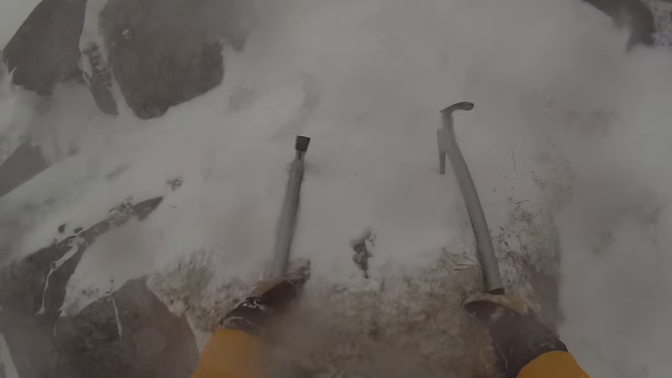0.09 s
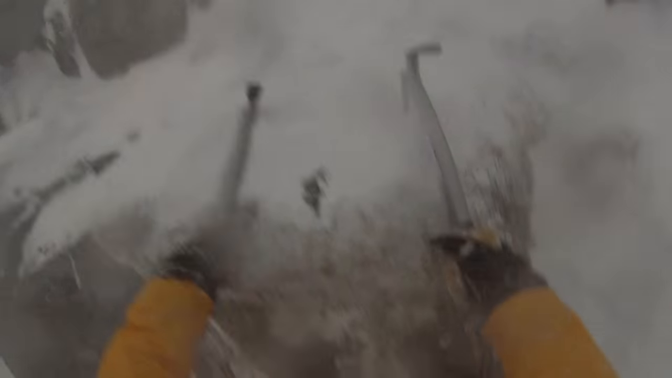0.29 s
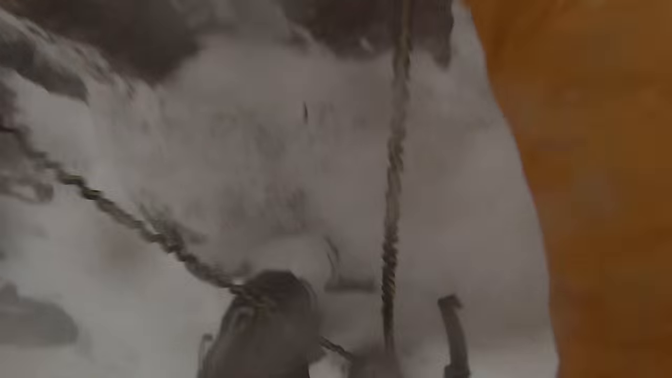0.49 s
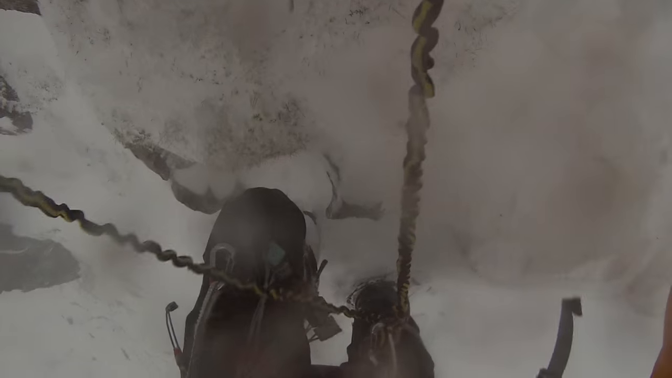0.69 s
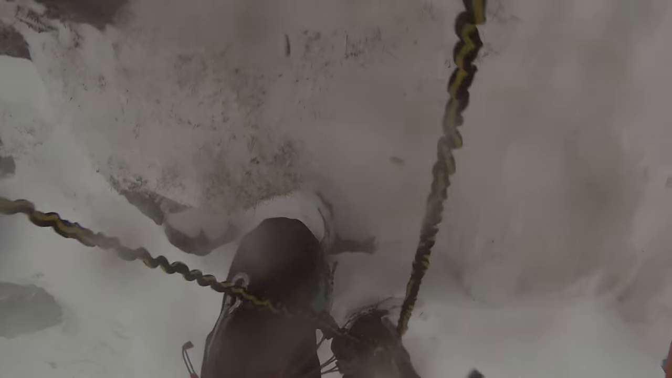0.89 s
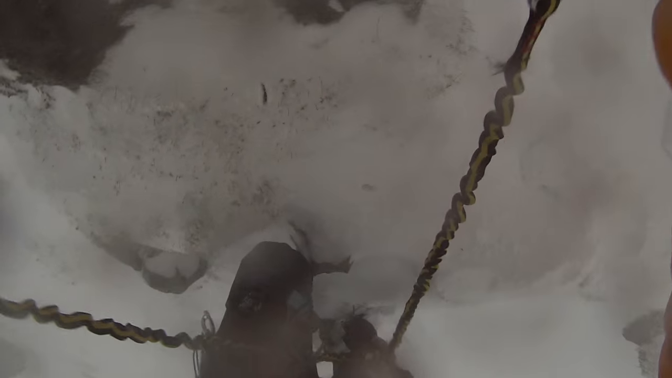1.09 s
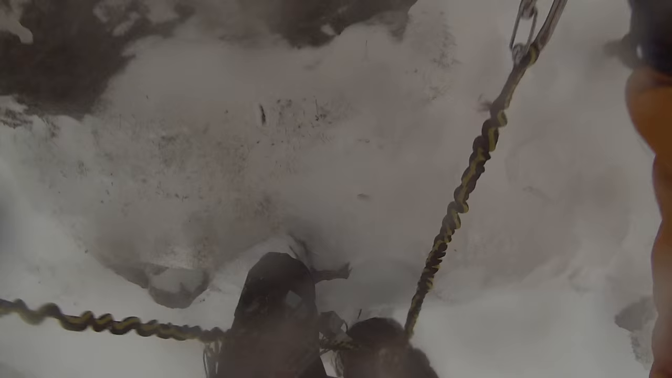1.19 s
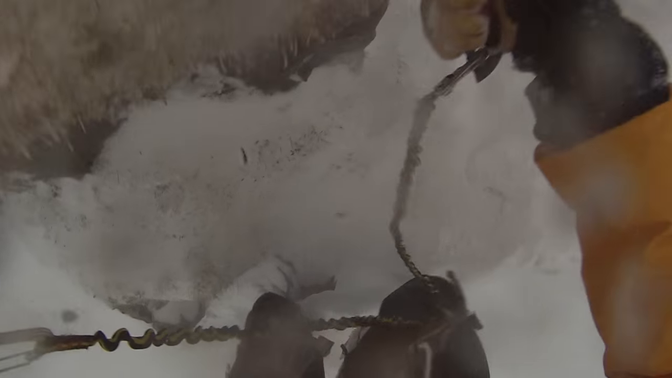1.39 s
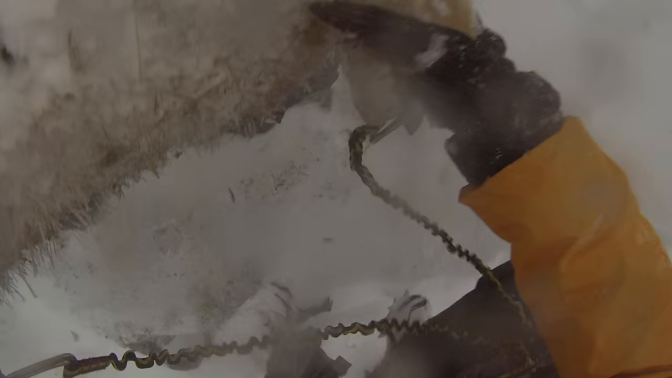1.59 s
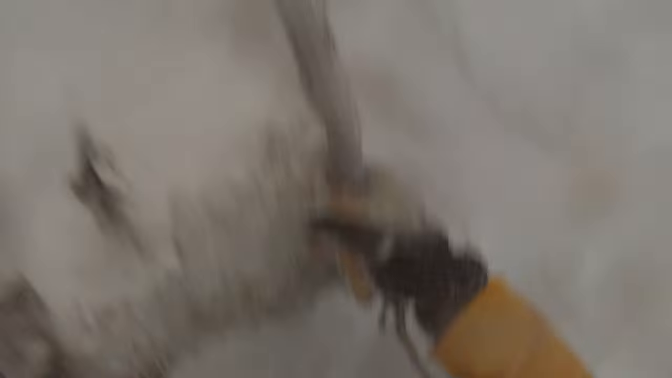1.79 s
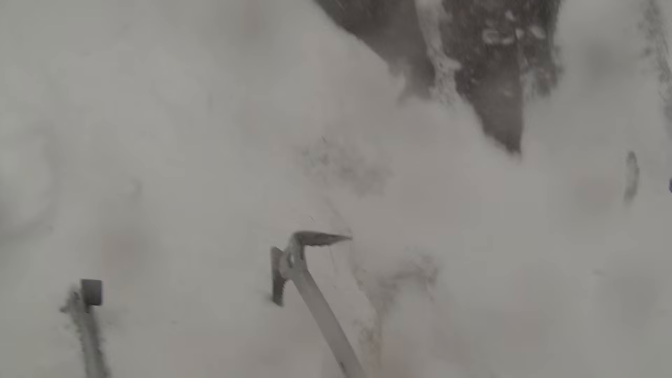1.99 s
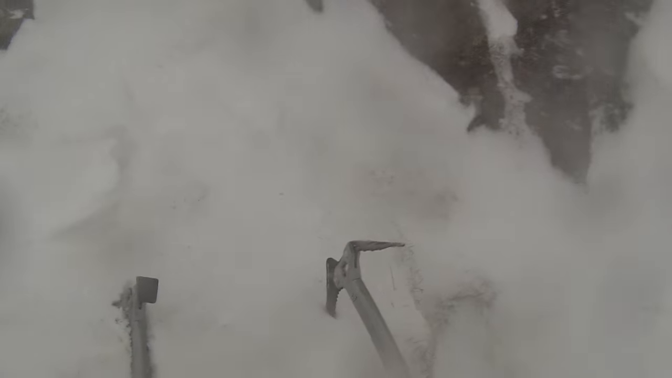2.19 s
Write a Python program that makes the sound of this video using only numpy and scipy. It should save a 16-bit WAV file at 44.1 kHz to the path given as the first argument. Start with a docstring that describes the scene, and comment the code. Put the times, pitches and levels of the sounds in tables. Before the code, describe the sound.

Two short axe chocks into frozen turf, with crisp snow crunch, icy snaps and low wind rumble

```python
"""Two ice axes bite into frozen snow and turf, each with a short dull chock, heard from a worn camera.
Each bite is a few ringing tones that sink in pitch, over a thud of shaped noise.
Snow crunches and stiff cloth rustles as showers of random ticks; icy snaps and crumbles are filtered bursts.
Jolts boom in the camera mount as fading low tones, and wind rumbles and hisses as slowly swelling noise."""
import sys
import numpy as np
from scipy.fft import rfft, irfft, next_fast_len
from scipy.io import wavfile
from scipy.ndimage import map_coordinates

SR = 44100
rng = np.random.default_rng(int(sys.argv[2]) if len(sys.argv) > 2 else 0)


def wav_out(sig):
    """Save sig, one row per channel (or a flat mono array), as 16-bit PCM at SR to the path in sys.argv[1]."""
    wavfile.write(sys.argv[1], SR, np.round(np.clip(np.atleast_2d(sig).T, -1, 1) * 32767).astype(np.int16))


N = 99225  # length in samples

# slow sway of the body against the microphone: t/s, level/dB
SWAY = [(0, -42.5), (.12, -49.5), (.21, -31), (.3, -54), (.41, -46.5), (.51, -34), (.6, -55), (.76, -58),
        (.85, -47), (1.02, -51), (1.42, -51.5), (1.7, -65.5), (1.8, -48.5), (1.97, -32), (2.05, -46.5),
        (2.25, -53)]
# tone colour of breaking ice and frozen snow: f/Hz, relative level/dB
ICE_COLOUR = [(300, -12), (1000, -11.5), (1550, 2), (3200, 4.5), (4200, -4), (5100, 7), (6800, -3),
              (11300, -3.5), (15000, -14.5)]
ICE_DB = 10  # added to the level of every snap and crumble


def amp(db):
    """Turn decibels into a gain."""
    return 10 ** (np.asarray(db) / 20)


def unit(x):
    """Scale to an rms (average strength) of 1."""
    return x / np.sqrt(np.mean(x ** 2) + 1e-20)


def curves(rows):
    """Draw straight lines between the rows: one curve for each column after the time."""
    times, *columns = np.transpose(rows)
    return [np.interp(np.arange(N) / SR, times, column) for column in columns]


def wobble(rate):
    """A smooth random curve through `rate` random points a second."""
    points = rng.standard_normal(int(N * rate / SR) + 4)
    return map_coordinates(points, [np.arange(N) * rate / SR])


def coloured(x, points, piece_hz=None):
    """Filter x to the (f/Hz, level/dB) points; a breaking piece also favours its own pitch."""
    lift_db, width_octaves = 10, 0.43
    m = 2 * next_fast_len(len(x) // 2 + 4096)
    octave = np.log2(np.fft.rfftfreq(m, 1 / SR) + 1)
    hz, db = np.transpose(points)
    shape_db = np.interp(octave, np.log2(hz + 1), db)
    if piece_hz:
        distance = (octave - np.log2(piece_hz)) / width_octaves
        shape_db = shape_db + lift_db * np.exp(-distance ** 2)
    # folding the cepstrum makes the filter respond at once, with nothing ahead of the blow
    cepstrum = irfft(np.log(unit(amp(shape_db)) + 1e-9), m)
    cepstrum[1:m // 2] *= 2
    cepstrum[m // 2 + 1:] = 0
    response = np.exp(rfft(cepstrum))
    return irfft(rfft(x, m) * response, m)[:len(x)]


def noise(points, size=N):
    """Coloured noise of rms 1, without the filter's start-up."""
    hiss = rng.standard_normal(size + 4096)
    return unit(coloured(hiss, points)[-size:])


def fade(t, t60):
    """Die away by 60 dB in t60 seconds."""
    return np.exp(-np.log(1000) * t / t60)


def add(track, s, sound):
    """Mix a sound into the track at s seconds."""
    part = track[max(0, round(s * SR)):][:len(sound)]
    part += sound[:len(part)]


def fractures(per_s, spread_db):
    """Sparse ticks at random moments, of random size up to a largest one, rms 1."""
    size_db = spread_db * np.minimum(rng.standard_normal(N), 1.4)
    sizes = amp(size_db) * rng.choice([-1, 1], N)
    happens = rng.random(N) < per_s / SR
    return unit(sizes * happens)


def crunch():
    """Snow and stiff cloth give way in clumps: crisp grains of several sizes, a fine rub, a duller scrape."""
    # strength of the crunch and rustle: t/s, crisp level/dB, scrape level/dB (both before the trim)
    rustle = [(0, -42, -43), (0.025, -44, -41.5), (0.06, -48, -53), (0.11, -51.5, -46), (0.19, -42, -44.5),
              (0.23, -45, -38.5), (0.27, -48.5, -48), (0.345, -51, -49.5), (0.445, -41.5, -43),
              (0.5, -48, -41.5), (0.55, -47.5, -47), (0.62, -49.5, -50.5), (0.68, -58, -57),
              (0.73, -57, -61.5), (0.78, -48.5, -58), (0.82, -52.5, -57), (0.885, -43, -47.5),
              (0.92, -47, -51.5), (1.07, -47.5, -49), (1.12, -49.5, -51.5), (1.17, -43, -45.5),
              (1.23, -51, -49), (1.32, -45, -49.5), (1.37, -49.5, -46), (1.425, -54.5, -50),
              (1.51, -42, -43.5), (1.59, -50.5, -50), (1.65, -48.5, -47.5), (1.678, -53, -48.5),
              (1.688, -56.5, -54), (1.745, -65, -64), (1.785, -52.5, -52.5), (1.815, -55, -47.5),
              (1.845, -55.5, -55), (1.88, -45.5, -47), (1.97, -50.5, -42), (2.03, -53.5, -50),
              (2.075, -50.5, -48.5), (2.09, -60.5, -55.5), (2.155, -65, -53), (2.19, -52.5, -44),
              (2.25, -43.5, -44)]
    # tone colour of the crisp treble: f/Hz, relative level/dB
    crisp_colour = [(300, -18.5), (1000, -12), (1800, -14), (3000, 0.5), (4200, 1), (5100, 3.5),
                    (6400, -3.5), (9500, -6.5), (11200, -6), (13500, -15), (15500, -17)]
    # tone colour of the scraping middle: f/Hz, relative level/dB
    scrape_colour = [(150, -5.5), (400, -16.5), (820, -20.5), (1050, -4), (1200, -10), (1420, 2.5),
                     (2200, -1), (2900, -8), (5000, -20.5), (14000, -28)]
    # favoured pitch of each size of grain: f/Hz
    grain_hz = [2000, 3200, 5000, 7500, 11500]
    trim_db, rub_db = -2, -1.5
    crisp_db, scrape_db = curves(rustle)
    clumps_db = 1.69 * wobble(130)  # quick random swells
    grains = np.zeros(N)
    for hz in grain_hz:
        ticks = fractures(per_s=170, spread_db=11)
        grains += coloured(ticks, crisp_colour, hz)
    crisp = unit(unit(grains) + amp(rub_db) * noise(crisp_colour))
    scratches = coloured(fractures(per_s=600, spread_db=5), scrape_colour)
    scrape = unit(scratches + 0.89 * noise(scrape_colour))
    crisp_gain = amp(crisp_db + trim_db + clumps_db)
    scrape_gain = amp(scrape_db + trim_db + clumps_db)
    return crisp_gain * crisp + scrape_gain * scrape


def mount():
    """The camera mount murmurs as the body sways, and swings at a low pitch after each jolt."""
    # jolts of the mount: t/s, level/dB, f/Hz, rise/s, time to fade by 60 dB/s
    jolts = [(0.189, -28, 112, 0.0069, .06), (.2421, -5, 118.8, 0.002, 0.105),
             (0.491, -26.5, 116.2, 0.018, 0.2), (0.61, -32, 120.2, 0.0021, 0.13),
             (0.862, -31, 121.5, 0.013, 0.12), (.932, -33.5, 112, 0.006, 0.14),
             (1.163, -24.5, 112.6, 0.0096, 0.073), (1.319, -29, 79, 0.0026, 0.053),
             (1.441, -37, 113, 0.0044, 0.1), (1.79, -26, 125, 0.006, 0.091),
             (1.907, -28, 90.7, 0.0065, 0.17), (1.9575, -17.5, 126, 0.004, 0.082)]
    # tone colour of the boom: f/Hz, relative level/dB
    boom_colour = [(15, 23), (28, 24), (50, -8), (75, 2), (110, 3), (200, -11), (400, -25), (1500, -112)]
    # tone colour of the murmur: f/Hz, relative level/dB
    murmur_colour = [(15, 4), (40, -20), (70, -0.5), (100, -2.5), (122, 4), (150, -12.5), (190, -18),
                     (300, -26.5), (600, -34), (2000, -100)]
    boom_db, boom_t60_s = -14.5, 0.16  # boom level is relative to the swing
    out, t = np.zeros(N), np.arange(SR // 3) / SR
    for s, db, hz, rise, t60 in jolts:
        swing = -np.sin(2 * np.pi * hz * t) * fade(t, t60)
        boom = amp(boom_db) * noise(boom_colour, size=len(t)) * fade(t, boom_t60_s)
        onset = 1 - np.exp(-t / rise)
        add(out, s, amp(db) * (swing + boom) * onset)
    sway_db, = curves(SWAY)
    return out + amp(sway_db) * noise(murmur_colour)


def wind():
    """Air rumbles with a faint hiss, swelling in slow gusts and as the climber moves through it."""
    # tone colour of the wind: f/Hz, relative level/dB
    wind_colour = [(12, 3), (28, 9.5), (55, -6), (110, -13.5), (250, -26), (700, -24), (1600, -30),
                   (5000, -44), (16000, -66)]
    middle_db, follows_sway = -49.5, 0.22  # the second is dB of wind per dB of sway
    sway_db, = curves(SWAY)
    gusts_db = 1.6 * wobble(3.93)
    movement_db = follows_sway * (sway_db - sway_db.mean())
    return amp(middle_db + gusts_db + movement_db) * noise(wind_colour)


def snaps():
    """Single pieces of icy crust break: one sharp click, then a few milliseconds of splinters."""
    # snaps: t/s, level/dB (before ICE_DB), favoured f/Hz
    breaks = [(0.082, -30, 4200), (0.1624, -26, 1980), (0.2772, -29.5, 3240), (.29, -35, 5000),
              (.4472, -29, 3600), (0.479, -26.5, 4600), (0.627, -31.5, 2880), (0.6603, -33, 3050),
              (0.7593, -30, 4000), (0.7625, -24, 3130), (0.9057, -17.5, 1640), (1.0668, -30.5, 5200),
              (1.2245, -28.5, 2240), (1.325, -33, 5000), (1.504, -28.5, 2890), (1.554, -28, 4840),
              (1.667, -32, 4700), (1.681, -27, 1750), (1.7066, -37, 4730), (1.771, -39, 3400),
              (1.917, -28, 5200), (1.9759, -22.5, 2150), (2.0008, -27.5, 3530), (2.0744, -36.5, 2520),
              (2.1724, -36, 4500)]
    splinter_size, splinter_t60_s = 0.45, 0.0038  # size is relative to the first click
    out, t = np.zeros(N), np.arange(SR // 40) / SR
    for s, db, hz in breaks:
        force = splinter_size * rng.standard_normal(len(t)) * fade(t, splinter_t60_s)
        force[0] = -1  # the first sharp click
        click = coloured(force, ICE_COLOUR, hz)
        add(out, s, amp(db + ICE_DB) * click / np.linalg.norm(click))
    return out


def crumbles():
    """Clods of frozen snow collapse: a quick run of small fractures that dies away."""
    # collapsing clods: t/s, level/dB (before ICE_DB), favoured f/Hz
    clods = [(0.144, -40, 1800), (0.4997, -25.5, 4330), (.98, -31, 3840), (1.1515, -28.5, 3550),
             (1.307, -27, 2020), (1.345, -28.5, 1950), (1.392, -35, 1720), (1.6397, -25, 4300),
             (1.862, -31, 1710)]
    out, t = np.zeros(N), np.arange(SR // 20) / SR
    for s, db, hz in clods:
        ticks = fractures(per_s=3500, spread_db=2.5)[:len(t)]
        force = ticks * fade(t, t60=0.022)
        burst = coloured(force, ICE_COLOUR, hz)
        add(out, s, amp(db + ICE_DB) * burst / np.linalg.norm(burst))
    return out


def picks():
    """The axe rings briefly, sinking in pitch as the turf chokes it, over a dull gritty thud."""
    # bites and knocks: t/s, ring level/dB, pitch ratio, ring time ratio, thud level/dB
    blows = [(0.2414, -27, 1.07, 0.4, -40), (0.2423, -19.5, 0.95, 1.25, -35),
             (0.483, -49, 0.85, 0.96, -36.5), (0.506, -40, 0.8, 1.0, -42), (1.217, -29, 0.86, 0.55, -43),
             (1.9068, -35.5, 0.88, 0.79, -30.5)]
    # tones of the buried axe, before each blow's ratios: settled f/Hz, level/dB, time to fade by 60 dB/s
    axe = [(1044, -16, 0.032), (1444, -9.5, 0.037), (1700, -3, 0.012), (1970, -6, 0.0069), (2346, 0, 0.011),
           (3950, -12, 0.0039)]
    # tone colour of the thud: f/Hz, relative level/dB
    thud_colour = [(80, -11), (330, 1), (500, -3.5), (630, 0), (800, -2.5), (1000, 0.5), (1500, -1),
                   (3000, -40), (9000, -50)]
    bite_s, thud_t60_s = 0.00016, 0.038
    sharp_share, sink_t60_s = 0.11, 0.016  # the ring starts sharp by this share and settles
    drift_size = 8.3  # random phase drift, radians per root second
    out, t = np.zeros(N), np.arange(SR // 8) / SR
    sinking_time = np.cumsum(1 + sharp_share * fade(t, sink_t60_s)) / SR
    for s, db, pitch, length, thud_db in blows:
        steps = rng.standard_normal((len(axe), len(t)))
        drift = drift_size * np.cumsum(steps, axis=1) / np.sqrt(SR)
        ring = np.zeros(len(t))
        for k, (hz, level, t60) in enumerate(axe):
            tone = np.sin(2 * np.pi * hz * pitch * sinking_time + drift[k])
            ring += (-1) ** k * amp(level) * fade(t, t60 * length) * tone
        thud = noise(thud_colour, size=len(t)) * fade(t, thud_t60_s)
        onset = 1 - np.exp(-t / bite_s)
        add(out, s, (amp(db) * ring + amp(thud_db) * thud) * onset)
    return out


def scene():
    """Everything is close and dry: the snow gives no echo."""
    return (crunch() + mount() + wind() + snaps() + crumbles() + picks())[None]


def record(dry):
    """The camera keeps nothing above its band limit."""
    top_hz = 15500
    m = next_fast_len(N + SR // 2)
    kept = np.fft.rfftfreq(m, 1 / SR) < top_hz
    return irfft(rfft(dry, m) * kept, m)[..., :N]


dry = scene()
out = record(dry)
wav_out(out)
```